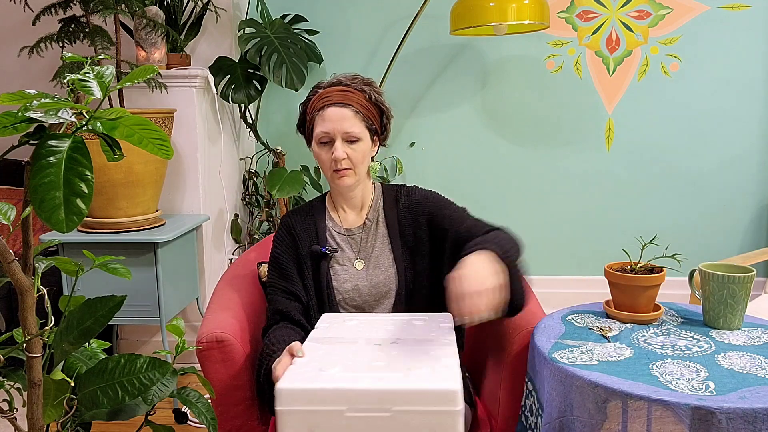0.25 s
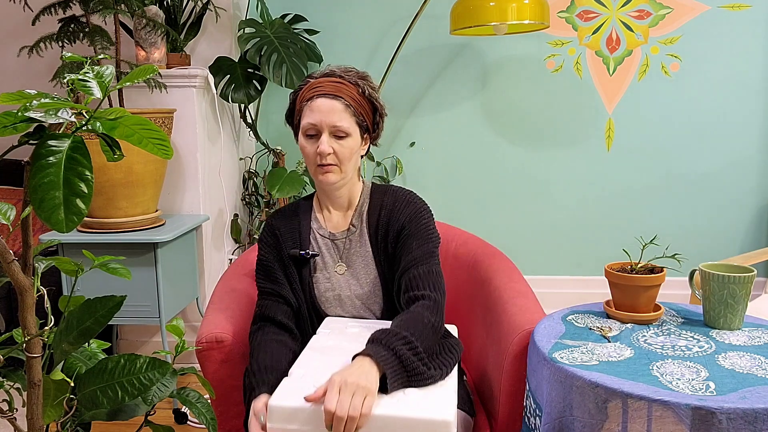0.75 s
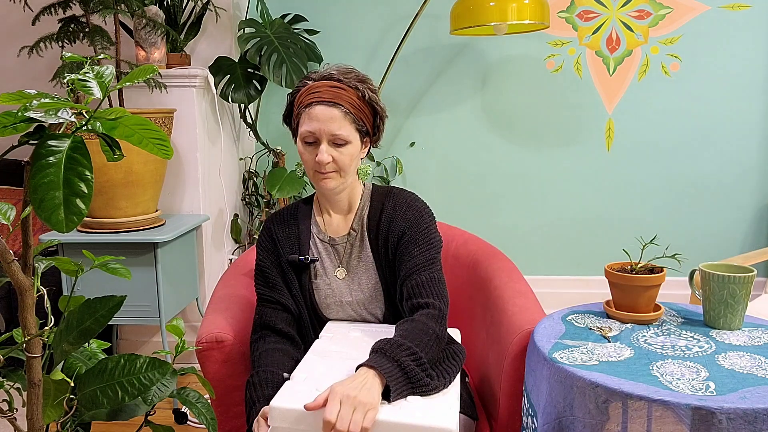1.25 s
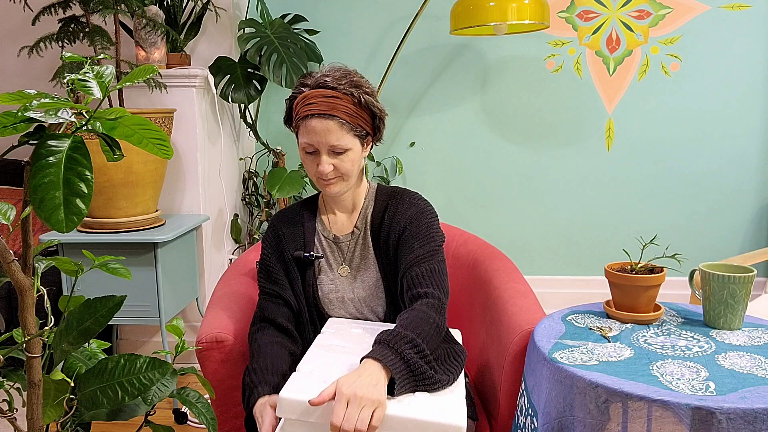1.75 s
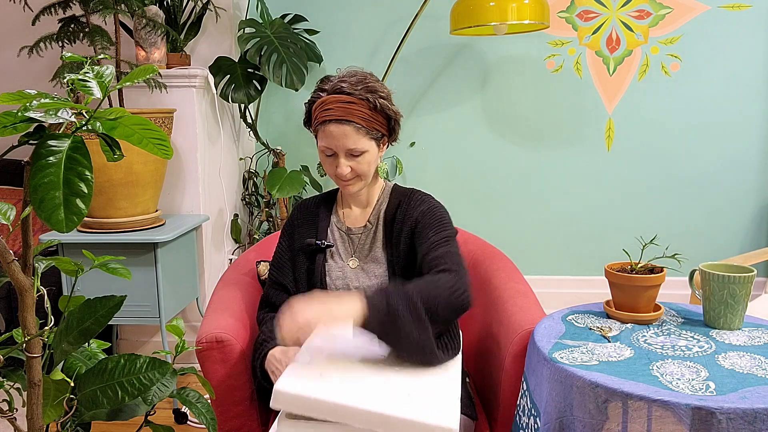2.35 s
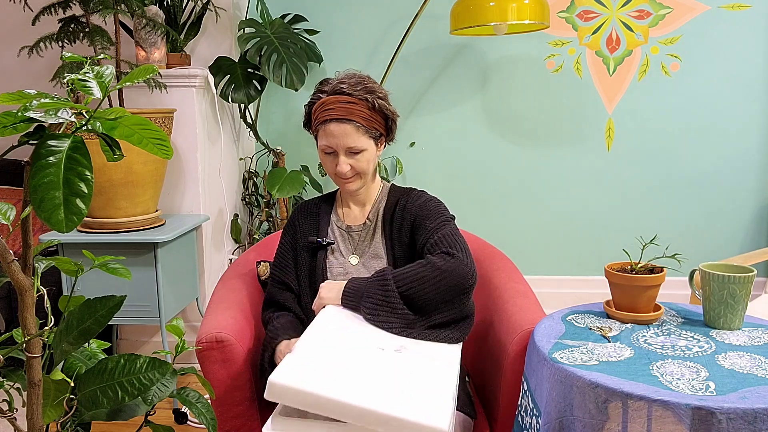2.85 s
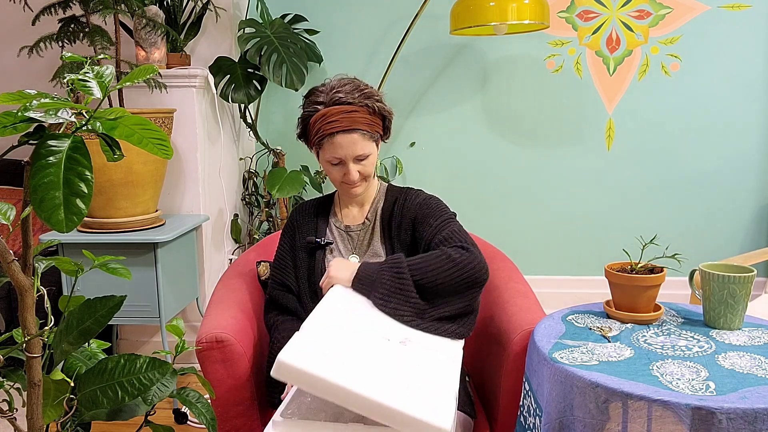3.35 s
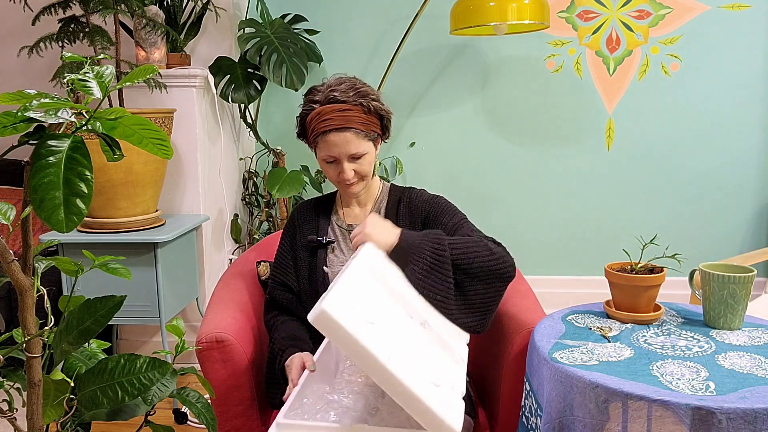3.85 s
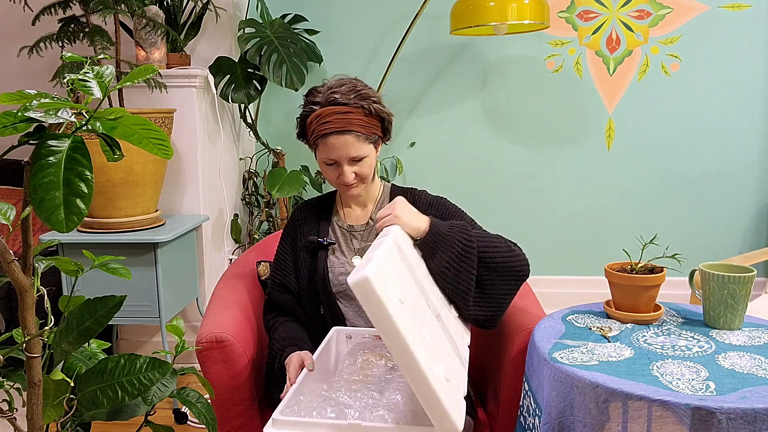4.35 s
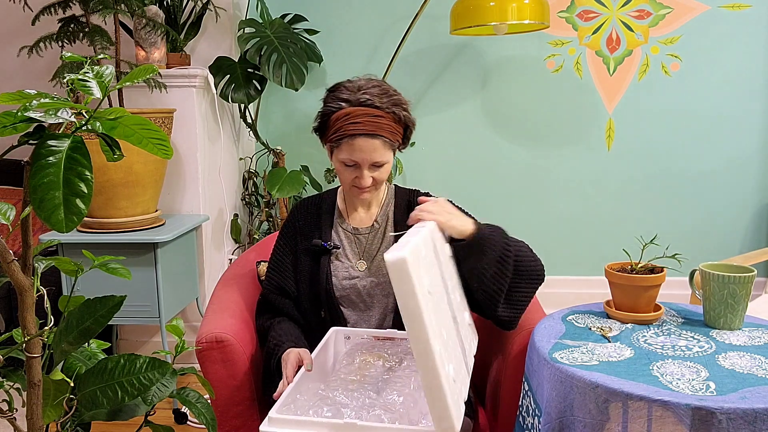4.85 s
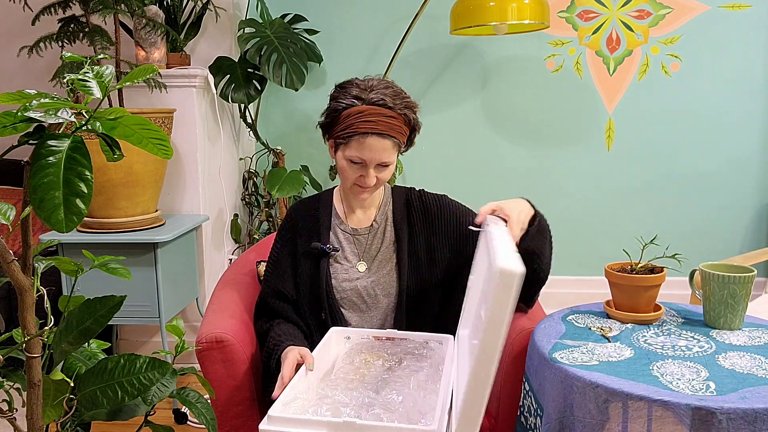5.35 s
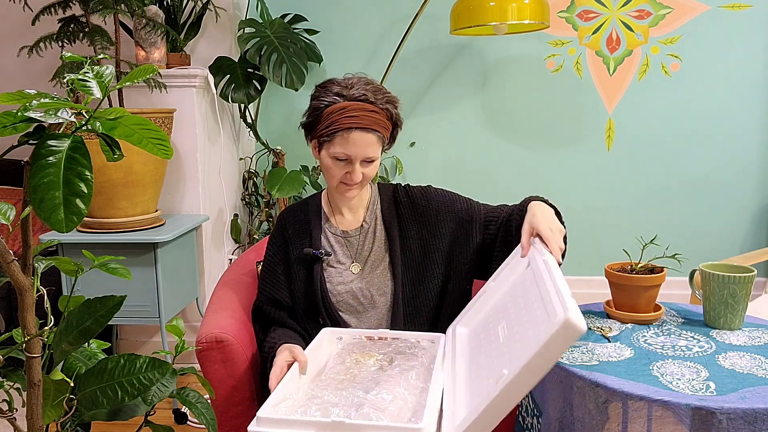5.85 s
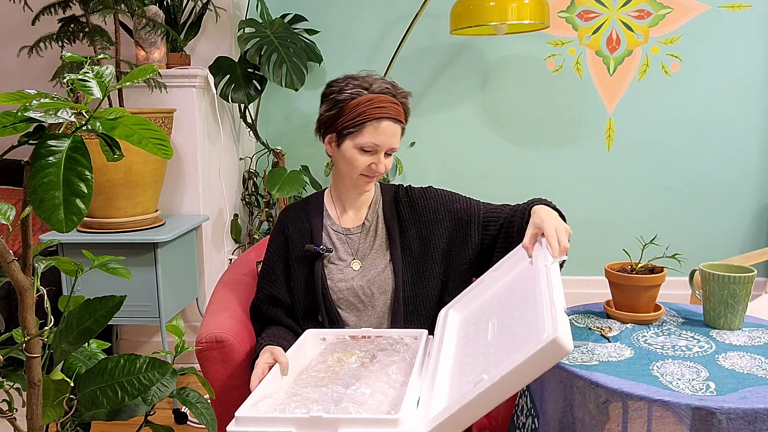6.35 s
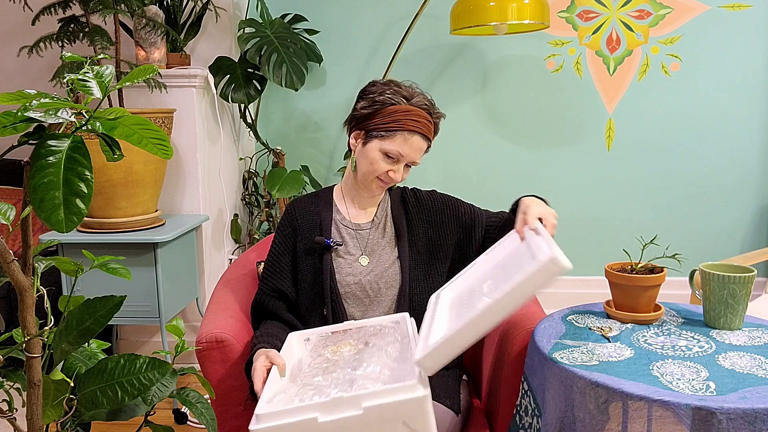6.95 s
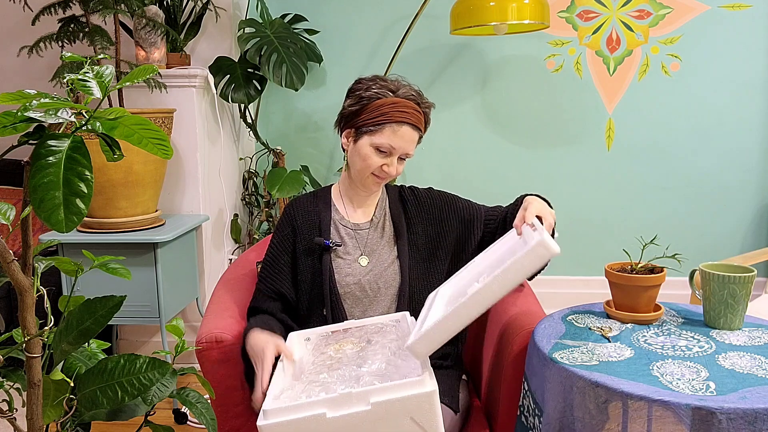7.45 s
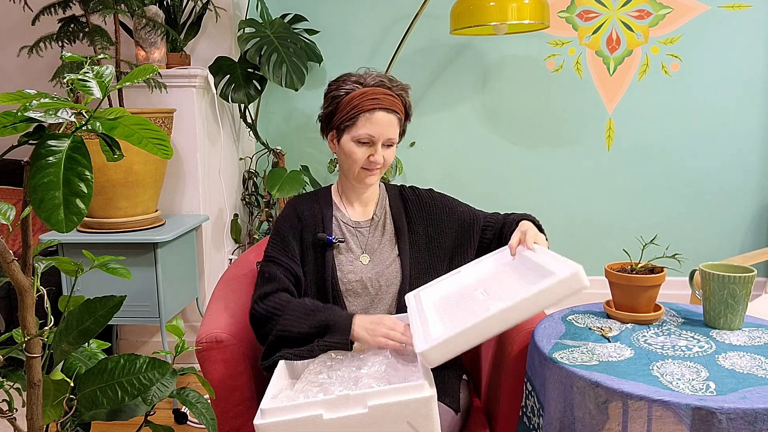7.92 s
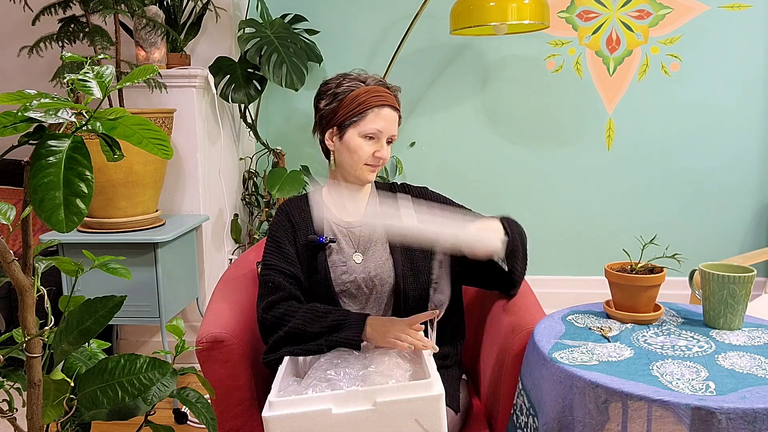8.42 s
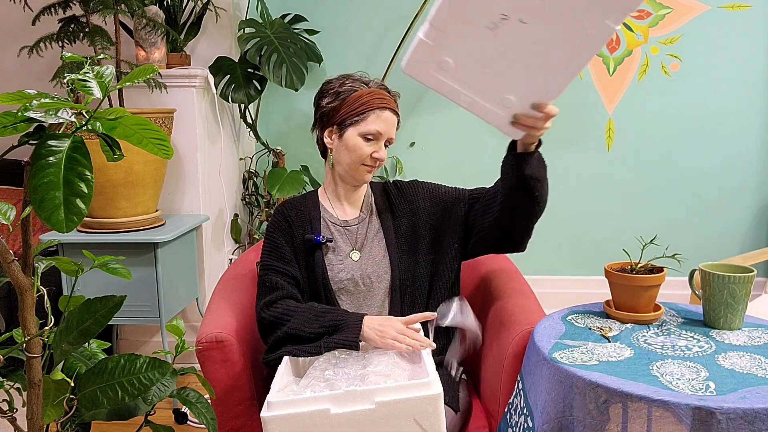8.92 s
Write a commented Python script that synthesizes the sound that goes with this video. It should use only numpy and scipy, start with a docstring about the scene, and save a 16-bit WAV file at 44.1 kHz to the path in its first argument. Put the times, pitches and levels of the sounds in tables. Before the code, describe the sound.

Hands work the tight lid off a foam box in a small room. Foam scrapes on foam, the rim catching in a burst of snaps and creaks. The lid groans and squeaks as it lifts, then the rubbing turns quiet. Hollow thumps and cracks follow, and a last rasping scrape comes as the lid tears free of its tape. One microphone picks it up with a slight room echo.

```python
"""Foam drags on foam as hands work the tight lid off a foam box in a small room. Tiny stick-slip jolts
ring the rim and the beads, set the light lid panel humming and rumble the hollow box. The rim catches,
snaps, creaks and squeaks, the lid groans on its hinge edge, bumps thump, and the raised lid rings on.
At last it is torn free of its tape. One microphone with a noise suppressor feeds both channels."""
import sys
import numpy as np
from scipy import signal
from scipy.fft import rfft, irfft, next_fast_len
from scipy.io import wavfile
from scipy.ndimage import uniform_filter1d, map_coordinates

SR = 44100
rng = np.random.default_rng(int(sys.argv[2]) if len(sys.argv) > 2 else 0)


def wav_record(signal):
    """Record a signal, one row per channel, as 16-bit PCM in the file named by sys.argv[1]."""
    frames = np.transpose(np.atleast_2d(signal))
    bounded = np.clip(frames, -1, 1)
    # unit amplitude maps onto the largest positive 16-bit level
    quanta = np.round(bounded * 32767).astype(np.int16)
    wavfile.write(sys.argv[1], SR, quanta)


N = 404838

# Resonances of the foam rim and its beads, coloured by grip and lid angle. Each row: pitch in Hz, width
# in Hz, then strength in dB per pass with the lid shut, ajar, upright, laid back and tearing its tape.
RIM_MODES = [(757, 385, -7, -1, 2.5, 3, -3), (1171, 360, 0.5, 4, 6.5, 7.5, 2), (1525, 640, 1, 3, 6, 6.5, 0),
             (2330, 1070, -3, -0.5, 5, 3.5, -3.5), (2731, 270, -3.5, -0.5, 6.5, 4, -2.5)]
BEAD_MODES = [(2890, 520, -6, -4, 2.5, -4.5, -5), (3680, 707, -3.5, 0, 6, 0, -0.5),
              (4696, 1560, -3, -2, 3.5, -0.5, -1), (6920, 2450, -4, -5, 0.5, -3.5, -3),
              (8260, 1126, -2.5, -3.5, 2.5, -1.5, -1.5), (10870, 3100, -10.5, -11, -3.5, -7.5, -9),
              (14580, 3200, -11.5, -12, -15, -8.5, -11)]
OPEN_S = 4.25  # from here the lid stands clear of the box


def drag():
    """Foam rubs on foam: fine slips ring rim and beads, coarser ones drive the lid panel and the box."""
    # Lid panel resonances. Each row: pitch in Hz, width in Hz, strength in dB per pass.
    panel_modes = [(234, 58, -0.5), (300, 100, 2.5), (430, 133, 3), (536.2, 87, 3.5), (652.7, 110, 0),
                   (900, 51, -15.5)]
    # Box resonances. Each row: pitch in Hz, width in Hz, strength in dB per pass with lid on and lid off.
    box_modes = [(56, 7.4, -1.5, -6.5), (94, 47, 0.5, -1), (151, 60, 3.5, 2), (203, 71, 3, 1)]
    rim_gain, panel_gain, bead_gain, box_gain = strokes() * sticking(hush_db=-9, before_s=.007)
    fine = slips(per_s=6000, spread_db=0, clump_db=1.6)
    crushed = fine * rng.choice([-1, 1], N)  # beads break at the same moments, in either direction
    coarse = slips(per_s=1500, spread_db=1, clump_db=2)
    rim = foam(unit(patchy(fine, depth_db=2.4)), RIM_MODES)
    beads = foam(unit(patchy(crushed, depth_db=2.2)), BEAD_MODES)
    hum = unit(filtered(patchy(coarse, depth_db=2.2), lambda hz: body(panel_modes)(hz)[0] ** 2))
    lid_on, lid_off = filtered(coarse, lambda hz: body(box_modes)(hz) ** 2)
    rumble = np.where(np.arange(N) > OPEN_S * SR, unit(lid_off), unit(lid_on))
    scrape = amp(-1) * rim_gain * rim + amp(.5) * bead_gain * beads
    return scrape + amp(-2.5) * panel_gain * hum + amp(-5.5) * box_gain * rumble


def strokes():
    """Each push swells, holds and dies away: gains for rim, panel, beads and box, adding in power."""
    # Each row: time of full force, hold, rise t60 and fall t60, all in seconds, rim drive in dB,
    # then panel, bead and box drive in dB over the rim's.
    pushes = [(0.044, 0.019, 0.026, 0.49, -18, -4.5, -3.5, -19.5),
              (0.233, 0.12, 0.73, 0.87, -40, -24, -7.5, -27.5), (0.521, 0.002, 0.13, 0.41, -46, -5, -3, -8),
              (0.648, 0.042, 0.27, 0.046, -44, -26, -6, -12),
              (0.782, 0.0126, 0.33, 0.46, -36.5, -19, -13, -7.5),
              (0.895, 0.013, 0.526, 0.8, -46, -23, -11, -31),
              (1.05, 0.049, 0.22, 0.14, -40.5, -14, -6, -12.5),
              (1.186, 0.014, 0.17, 0.8, -41, -9, -0.5, 1.5),
              (1.289, 0.014, 0.01, 0.044, -26.5, -22, -9, -20),
              (1.333, 0.327, 0.28, 0.35, -31.5, -6.5, -4, -2.5),
              (1.373, 0.019, 0.022, 0.03, -19, -4, -11, -31.5),
              (1.445, 0.028, 0.008, 0.04, -11, -8, -2.5, -33),
              (1.508, 0.24, 0.008, 0.74, -27, -3.5, -7.5, -3.5),
              (1.707, 0.019, 0.25, 0.08, -35, 15, 5, 14.5),
              (1.914, 0.042, 0.15, 0.037, -29.5, -8, -9.5, -4.5),
              (2.045, 0.03, 0.14, 0.12, -31, -11, -7, 1), (2.184, 0.014, 0.51, 0.19, -25.5, -3, -4.5, -3),
              (2.37, 0.002, 1, 0.16, -37, 1.5, 4, -24), (2.5, 0.01, 0.11, 0.69, -29, -12.5, -6, -39),
              (2.576, 0.029, 0.2, 0.72, -30.5, 5, -6.5, -15),
              (2.723, 0.048, 0.18, 0.061, -24.5, 6, -7.5, -17),
              (2.912, 0.043, 0.39, 0.57, -35.5, -27, -1, -15),
              (2.913, 0.017, 0.047, 0.14, -27.5, -0.5, 1, -13.5),
              (2.987, 0.016, 0.00793, 0.048, -32.5, -2, -5.5, -24),
              (3.116, 0.022, 0.25, 0.18, -34, 5.5, -6.5, -30), (3.307, 0.36, 0.23, 0.57, -29, 9, -6, -14.5),
              (3.593, 0.233, 0.67, 0.085, -23, 2.5, -5, -9),
              (3.722, 0.026, 0.22, 0.27, -24.5, -9.5, 5.5, 3),
              (3.79, 0.061, 0.36, 0.13, -22, 0.5, -4.5, -4.5), (3.932, 0.002, 0.12, 0.13, -20, 8, 0, -21),
              (4.025, 0.076, 0.194, 0.047, -23.5, 3.5, -4, -18),
              (4.086, 0.015, 0.0067, 0.16, -23, 8, -1.5, 4.5), (4.199, 0.002, 0.04, 0.23, -42, 0, -2, -9.5),
              (4.299, 0.096, 0.024, 0.093, -62.5, -7, 7, 20.5),
              (4.372, 0.03, 0.074, 0.14, -37.5, -24, -7.5, -17),
              (4.691, 0.077, 0.18, 0.054, -61, -24, 9, -19), (4.76, 0.011, 0.07, 0.15, -64, -19, -7.5, 19),
              (4.903, 0.013, 0.053, 0.18, -70, -17, 0.5, 0), (5.015, 0.0094, 0.049, 1, -62.5, -23.5, 5, -1),
              (5.147, 0.0035, 0.11, 0.32, -38.5, -0.5, -8, 3),
              (5.45, 0.087, 0.354, 0.1, -65, -21.5, 0.5, -15.5),
              (5.534, 0.0079, 0.057, 0.18, -56.5, 4, 8, 15), (5.649, 0.053, 0.93, 0.73, -66, -14, 1.5, 6),
              (6.146, 0.024, 0.041, 0.14, -36.5, 1.5, 1, -1.5),
              (6.243, 0.028, 0.032, 0.11, -40, 4.5, 3, -1), (6.323, 0.11, 0.042, 0.32, -41, 1.5, -2, -10),
              (6.385, 0.0074, 0.1, 0.053, -30, 5, -5.5, 4.5), (6.514, 0.002, 0.012, 0.22, -25, 2, -10.5, 0),
              (6.594, 0.078, 0.008, 0.23, -49, 4, 1, 4), (6.753, 0.019, 0.023, 0.16, -42, 2.5, -2, 2.5),
              (6.818, 0.002, 0.24, 0.2, -41.5, 7, -10.5, 3.5),
              (6.888, 0.011, 0.068, 0.052, -24, 6, -8, 4.5),
              (6.927, 0.014, 0.13, 0.092, -23, 4.5, -5, -8.5),
              (6.979, 0.0018, 0.048, 0.14, -26.5, 1.5, -6, 8),
              (7.043, 0.02, 0.035, 0.19, -20.5, 4.5, -6, 0), (7.25, 0.002, 0.14, 0.57, -67, 11, 4.5, 9),
              (7.529, 0.011, 0.39, 0.23, -65.5, 18, 0, 9.5), (7.995, 0.042, 0.06, 0.3, -40.5, 5, -5.5, 9),
              (8.145, 0.238, 0.22, 0.023, -46.5, -1.5, -1.5, -3),
              (8.234, 0.057, 0.061, 0.15, -13.5, -0.5, -2.5, -3),
              (8.278, 0.0018, 0.007, 0.35, -15, 0, -9, -9),
              (8.528, 0.14, 0.302, 0.29, -17, -2.5, -1, -14.5),
              (8.673, 0.018, 0.03, 0.098, -17, 4.5, -2.5, -2.5),
              (9.093, 0.0077, 0.054, 0.11, -58, 0.5, 8.5, -6)]
    power, t = np.zeros((4, N)), np.arange(N) / SR
    for s, hold, rise, fall, db, *shares_db in pushes:
        hold, rise, fall = np.clip([hold, rise, fall], .002, 1)
        span = slice(max(round((s - 1.5 * rise) * SR), 0), round((s + hold + 1.5 * fall) * SR))
        below_db = 60 * np.maximum((s - t[span]) / rise, (t[span] - s - hold) / fall).clip(0)
        peaks = amp(db + np.r_[0, shares_db])
        power[:, span] += (peaks[:, None] * amp(-below_db)) ** 2
    return np.sqrt(power)


def slips(per_s, spread_db, clump_db):
    """Tiny stick-slip jolts at random moments, their strength swelling in clumps."""
    size = amp(spread_db * rng.exponential(size=N)) * rng.standard_normal(N)
    return (rng.random(N) < per_s / SR) * size * amp(clump_db * wobble(45))


def sticking(hush_db, before_s):
    """The rim holds fast just before each snap, so the drag ducks."""
    at = np.round(releases()[0] * SR).astype(int)
    marks = np.bincount(at, minlength=N)
    span = round(before_s * SR)
    stuck = uniform_filter1d(marks * float(span), span, origin=-(span // 2))
    return amp(hush_db * uniform_filter1d(np.clip(stuck, 0, 1), 40))


def patchy(x, depth_db):
    """The contact wanders over the foam, so the colour shifts from moment to moment."""
    bands = signal.stft(x, nperseg=512)[2]
    patches = uniform_filter1d(rng.standard_normal(bands.shape), 2, axis=0)
    patches = uniform_filter1d(patches, 20, axis=1)
    return signal.istft(bands * amp(depth_db * unit(patches)), nperseg=512)[1][:N]


def foam(jolts, modes):
    """Jolts pass twice through the foam's modes, coloured by the lid's stage at that moment."""
    # Each row: start in seconds, stage colour (0 shut, 1 ajar, 2 upright, 3 laid back, 4 tape).
    stages = [(0, 4), (.45, 0), (2.45, 1), (4.25, 2), (6.1, 3), (8.2, 4)]
    start, stage = np.transpose(stages)
    stage_now = stage[np.searchsorted(start * SR, np.arange(N), "right") - 1]
    response = body(modes)(np.fft.rfftfreq(4096, 1 / SR)) ** 2
    rings = irfft(response / np.sqrt(np.mean(np.abs(response) ** 2, axis=1, keepdims=True)))
    by_stage = jolts * (stage_now == np.arange(len(rings))[:, None])
    return signal.oaconvolve(by_stage, rings, axes=1)[:, :N].sum(axis=0)


def releases():
    """The rim catches and lets go, in single snaps or in quick steps that creak."""
    # Each row: time in seconds, relative level in dB, bead share in dB.
    singles = [(0.041, -17.5, -3), (0.516, -23.5, -9.5), (1.045, -23, -29.5), (1.18, -27.5, -21),
               (1.2, -25.5, -20.5), (1.254, -25, -14.5), (1.295, -21.5, -4), (1.331, -14, -10.5),
               (1.379, -13, -19.5), (1.393, -13, -12.5), (1.481, -6, -11), (1.512, -6.5, -12),
               (1.522, -9.5, -14), (1.56, -11, -9), (1.571, -9.5, -8), (1.58, -9, -8), (1.605, -11, -18),
               (1.624, -10, -14.5), (1.654, -5, -16), (1.722, -16.5, -28), (1.92, -17, -17),
               (2.701, -19.5, -7.5), (3.767, -11.5, -9.5), (3.796, -8, -13.5), (3.894, -18.5, -16),
               (3.914, -20.5, -15), (3.924, -3.5, -6), (4.099, -11, -5), (4.202, -28, 1.5), (4.582, -56, 4),
               (4.699, -48, 17), (6.144, -27.5, 3.5), (6.323, -23, -28), (6.514, -17, -22),
               (6.571, -26.5, -21), (6.871, -24, -8.5), (6.921, -11, -22), (6.938, -9.5, -19.5),
               (6.985, -20.5, -21.5), (7.038, -10, -12.5), (7.251, -54, -5), (8.222, -11.5, -11.5),
               (8.678, -8, -7.5), (9.096, -64, 3)]
    # Each row: start, end and first gap in seconds, ratio of each gap to the one before.
    creaks = [(1.4455, 1.475, .0016, 1.11), (1.529, 1.553, .0056, 1.0)]
    # One row per creak: relative level in dB, bead share in dB.
    creak_levels = [(-13, -11), (-16, -4)]
    steps = []
    for (start, end, gap, growth), levels in zip(creaks, creak_levels):
        times = start + np.r_[0, np.cumsum(gap * growth ** np.arange(16))]
        steps += [(s, *levels) for s in times if s <= end]
    return np.transpose(singles + steps)


def snaps(crackle_t60=.006):
    """Each release is one blow on the rim and a tiny burst of crackle in the beads."""
    s, db, bead_db = releases()
    at = np.round(s * SR).astype(int)
    t = np.arange(300) / SR
    decay = amp(db[:, None] + bead_db[:, None] - 2 - 60 * t / crackle_t60)
    crackle = rng.standard_normal(decay.shape) * decay
    blows = np.bincount(at, amp(db), N)
    spray = np.bincount((at[:, None] + np.arange(len(t))).ravel(), crackle.ravel(), N)
    return amp(11.5) * foam(blows, RIM_MODES) + foam(spray, BEAD_MODES)


def thumps():
    """Lid or box is bumped or jerks: one quickly dying tone each time."""
    # Each row: start in seconds, relative level in dB, pitch in Hz, cycles to fall 30 dB (kept to 1-20).
    bumps = [(0.514, -32.5, 648, 14), (0.516, -25.5, 1170, 11), (1.045, -25.5, 132, 2),
             (1.325, -29, 169.7, 19), (1.685, -19, 200, 18), (2.757, -5, 265, 3), (2.762, -4, 114, 1.5),
             (3.893, -14.5, 607, 5), (3.903, -12.5, 628, 4.5), (3.928, -7.5, 422, 3.5),
             (3.956, -22, 602.5, 7), (4.1, -3.5, 649, 2.5), (4.757, -37.5, 80, 5),
             (4.907, -47.5, 61.2, 4.5), (5.165, -27.5, 83.5, 4), (5.532, -30.5, 96, 10.5),
             (6.324, -20, 386, 7.5), (6.337, -25.5, 190.5, 11.5), (6.365, -20.5, 167, 7),
             (6.383, -12, 305, 4.5), (6.516, -1.5, 363, 3), (6.569, -23.5, 378, 4), (6.87, -15, 324.7, 9.5),
             (6.886, -12, 401.6, 12), (6.896, -13.5, 352, 3), (6.925, 2.5, 328, 2.5),
             (6.94, -4.5, 241, 3.5), (6.985, -15, 271, 5), (7.037, -5.5, 295, 3), (7.046, -1, 305, 4),
             (7.06, -11.5, 334, 11), (7.076, -8.5, 256.7, 5.5), (8.026, -25.5, 374.4, 20.5),
             (8.279, -6.5, 231, 0.5), (8.676, -6, 299, 3)]
    out, t = np.zeros(N + SR), np.arange(SR // 4) / SR
    for s, db, hz, cycles in bumps:
        attack = 1 - np.exp(-t * hz / .26)
        decay = amp(db + 4.5 - 30 * t * hz / np.clip(cycles, 1, 20))
        out[round(s * SR):][:len(t)] -= attack * decay * np.sin(2 * np.pi * hz * t)
    return out[:N]


def groan(fade_s=.0082):
    """The lid rubs on its hinge edge: a fuzzy hum whose pitch glides with the angle."""
    # One list per glide. Each point: time in seconds, pitch in Hz, relative level in dB.
    glides = [
        [(2.48, 479, -45), (2.526, 419.3, -24.5), (2.692, 454.6, -25.5), (2.766, 378, -17), (2.78, 363, -30.5)],
        [(3.02, 587, -30), (3.054, 564.5, -30.5), (3.14, 479, -21), (3.2, 486, -49)],
        [(3.25, 562.5, -23.5), (3.35, 544, -21.5), (3.4, 436, -14), (3.47, 512, -17.5)],
        [(3.475, 432, -19.5), (3.52, 503, -11.5), (3.575, 640, -15)],
        [(3.6, 439, -19.5), (3.65, 298.6, -17.5), (3.715, 289, -11.5)],
        [(3.75, 410, -16), (3.82, 509, -16.5), (3.88, 576, -19)],
        [(3.78, 221, -20.5), (3.82, 243, -15.5), (3.855, 257, -22)],
        [(3.988, 310, -12), (4.1, 429, -43)],
        [(6.73, 665, -51.5), (6.83, 652, -29.5), (6.88, 615, -34)],
    ]
    out, t = np.zeros(N), np.arange(N) / SR
    for points in glides:
        s, hz, db = np.transpose(points)
        fade = np.clip(np.minimum(t - s[0], s[-1] - t) / fade_s, 0, 1)
        phase = 2 * np.pi * np.cumsum(np.interp(t, s, hz)) / SR
        tone = (1.3 + .7 * wobble(45)) * np.sin(phase) + .7 * wobble(45) * np.cos(phase)
        out += fade * amp(np.interp(t, s, db) - 8) * tone
    return out


def squeaks(fuzz=.09):
    """The foam sings on one narrow band, about fuzz times its pitch wide, swelling and fading once."""
    # Each row: start in seconds, length in seconds, pitch in Hz, relative level in dB.
    notes = [(.66, .33, 1510, -46.5), (2.816, 0.1, 1640, -43), (2.908, 0.056, 470, -32),
             (4.192, 0.036, 11500, -53), (4.684, 0.13, 3140, -64), (4.714, 0.077, 1085, -66.5),
             (5.63, 0.089, 1070, -69), (6.084, 0.15, 1800, -55), (6.253, 0.0064, 5920, -22.5),
             (7.276, 0.11, 1650, -72), (7.412, 0.17, 570, -58), (7.482, 0.086, 2800, -70),
             (7.494, 0.085, 1750, -72.5), (7.741, .008, 5650, -50), (7.851, 0.14, 550, -62.5),
             (8.701, 0.19, 1198, -37.5)]
    out = np.zeros(N)
    for s, length, hz, db in notes:
        t = np.arange(round(length * SR)) / SR
        flutter, drift = (map_coordinates(row, [t * hz * fuzz]) for row in rng.standard_normal((2, 256)))
        phase = 2 * np.pi * hz * t
        tone = (.5 + flutter) * np.sin(phase) + drift * np.cos(phase)
        out[round(s * SR):][:len(t)] += amp(db) * np.sin(np.pi * t / t[-1]) * tone
    return out


def lid_ring(x, damped_s=8.2):
    """The raised lid rings, the shifting grip favouring different modes, until a firm hold damps it."""
    # Each row: pitch in Hz, width in Hz, relative strength in dB.
    lid_modes = [(440, 35, -5.5), (836, 31, 0), (1067, 81, -1.5), (1426, 14, -8), (1800, 26, -6),
                 (2820, 37, -4.5), (3140, 32, -2), (4500, 43, -8), (6680, 99, -7.5)]
    t = np.arange(N) / SR
    drive = x * ((t > OPEN_S) & (t < damped_s))
    return amp(8.5) * sum(filtered(drive * amp(3 * wobble(5)), body([mode]))[0] for mode in lid_modes)


def hollowed(x, depth=.76):
    """One band dips for a spell and the rub sounds hollow."""
    # Each row: start in seconds, end in seconds, centre in Hz, width in Hz.
    dips = [(.45, 1.696, 3550, 798), (2.676, 3.26, 2478, 850)]
    t = np.arange(N) / SR
    lost = sum(filtered(x * ((t > start) & (t < end)), body([(hz, width, 0)]))[0]
               for start, end, hz, width in dips)
    return x - depth * lost


def room(x):
    """A small room answers just after the sound, each frequency dying at its own speed."""
    # Each row: frequency in Hz, t60 in seconds.
    decay_times = [(200, 0.3), (1500, 0.17), (6000, 0.25), (14000, 0.05)]
    hz, t, bands = signal.stft(rng.standard_normal(SR // 2), SR, nperseg=256)
    tail = signal.istft(bands * amp(-60 * t / along(decay_times, hz)[:, None]), SR, nperseg=256)[1]
    return signal.fftconvolve(np.pad(x, (250, 0)), tail / np.linalg.norm(tail))[:N]


def hiss(level_db=-64.5):
    """A faint, steady bed of noise."""
    # Each row: frequency in Hz, relative level in dB.
    colour = [(35, -33.5), (60, -16), (613, -7.5), (1590, -6), (2150, -11.5), (4740, -9), (14500, -12),
              (15500, -16.5)]
    return amp(level_db) * unit(filtered(rng.standard_normal(N), lambda hz: amp(along(colour, hz))))


def body(modes):
    """Frequency response of damped modes in alternating polarity, one row per column of strengths."""
    return lambda f: sum((-1) ** k * amp(db)[:, None] * 1j * f * width / (hz**2 - f**2 + 1j * f * width)
                         for k, (hz, width, *db) in enumerate(modes))


def filtered(x, response):
    """x through a complex response, given as a function of Hz."""
    size = next_fast_len(N + SR // 2)
    return irfft(rfft(x, size) * response(np.fft.rfftfreq(size, 1 / SR)), size)[..., :N]


def wobble(rate):
    """A smooth random curve, rate knots a second."""
    return map_coordinates(rng.standard_normal(int(N * rate / SR) + 4), [np.arange(N) * rate / SR])


def along(points, hz):
    """A curve through (Hz, value) points on a log frequency axis."""
    knots_hz, values = np.transpose(points)
    return np.interp(np.log(hz + 1), np.log(knots_hz + 1), values)


def amp(db):
    """Decibels to gain."""
    return 10 ** (np.asarray(db) / 20)


def unit(x):
    """Scaled to rms 1."""
    return x / np.sqrt(np.mean(x ** 2) + 1e-20)


def scene():
    """Box sounds, their echo and a faint hiss, alike in both channels."""
    rub = hollowed(drag()) + groan() + squeaks()
    cracks = snaps()
    hits = cracks + thumps()
    room_send = amp(-17.5) * rub + amp(-19) * hits
    mono = rub + hits + hiss() + lid_ring(rub + cracks) + room(room_send)
    return np.array([mono, mono])


def record(dry):
    """A noise suppressor ducks weak bands, peaks are softly held, deep bass and top treble are cut."""
    gate_db, floor_gain, ceiling = -82.5, .12, .95
    low_hz, top_hz = 28, 15800
    bands = signal.stft(dry, nperseg=512)[2]
    power = uniform_filter1d(np.abs(bands) ** 2, 9, axis=1)
    power = np.abs(uniform_filter1d(power, 3, axis=2))
    gain = np.clip(power / (power + amp(gate_db) ** 2), floor_gain, 1)
    clean = signal.istft(bands * gain, nperseg=512)[1][:, :N]
    limited = clean / (1 + np.abs(clean / ceiling) ** 6) ** (1 / 6)
    return filtered(limited, lambda hz: (hz < top_hz) * hz ** 2 / (hz ** 2 + low_hz ** 2))


dry = scene()
out = record(dry)
wav_record(out)
```